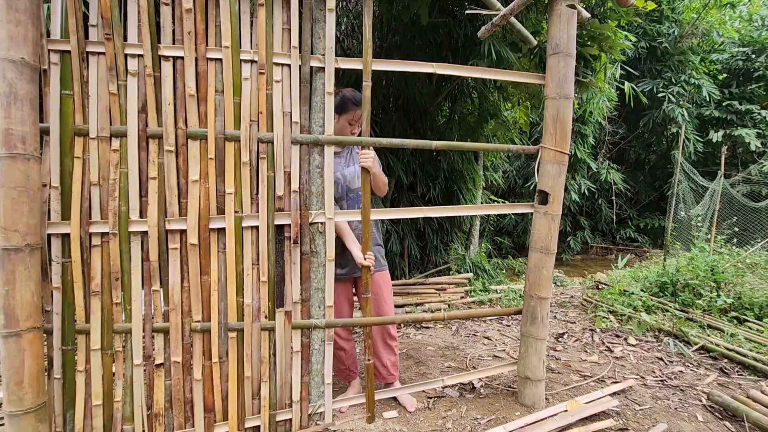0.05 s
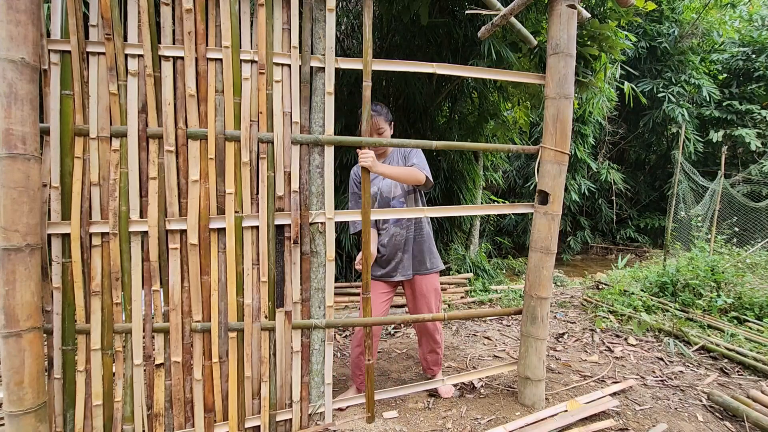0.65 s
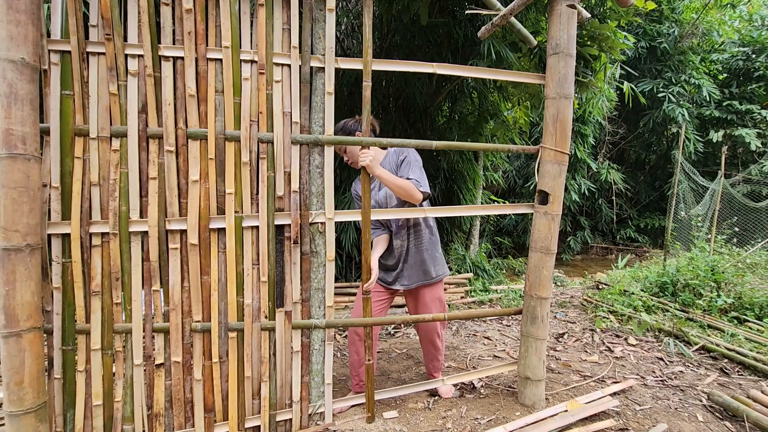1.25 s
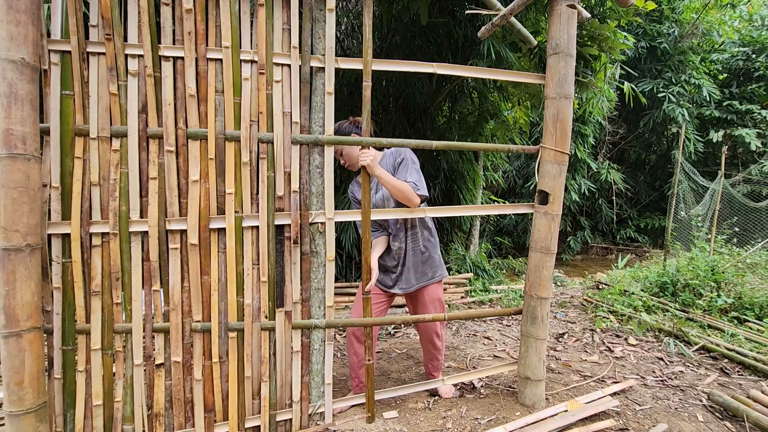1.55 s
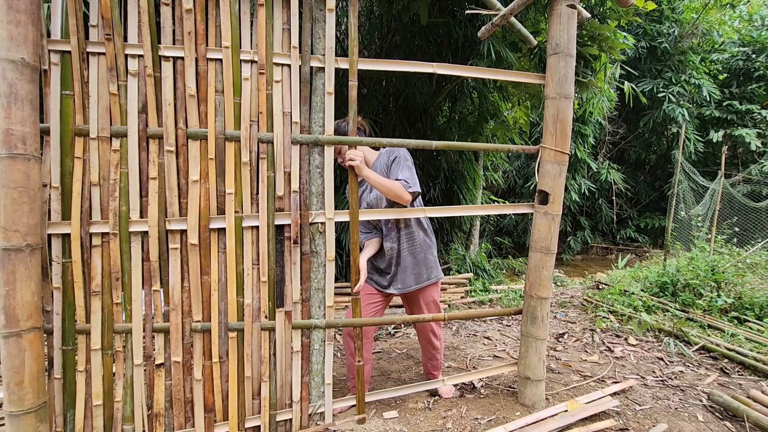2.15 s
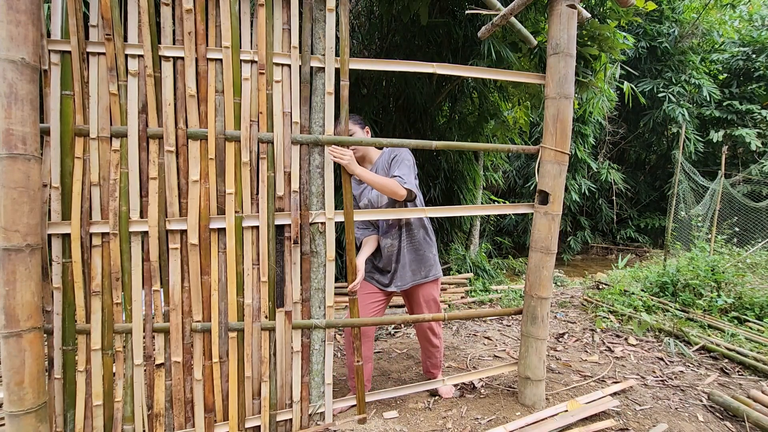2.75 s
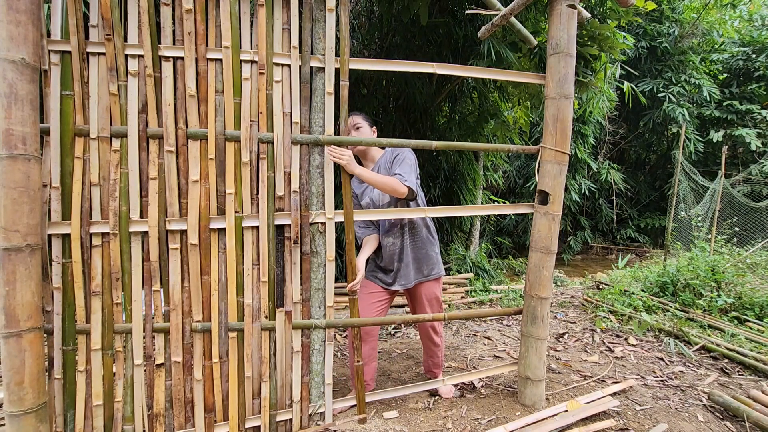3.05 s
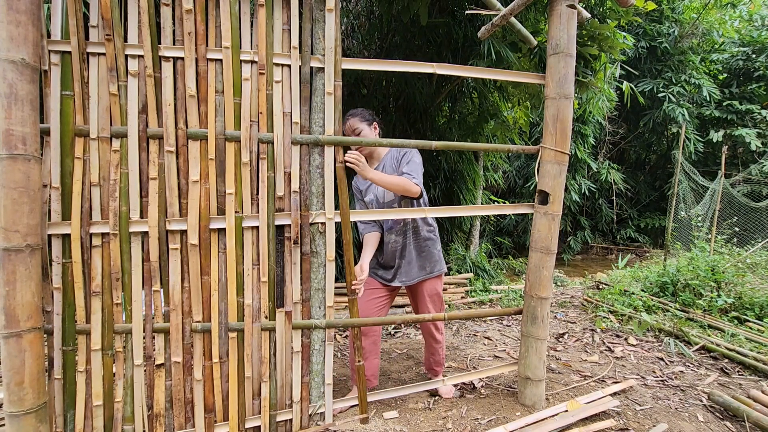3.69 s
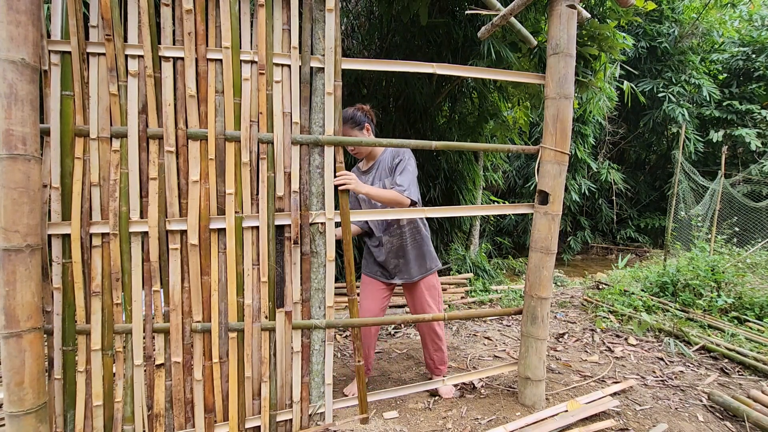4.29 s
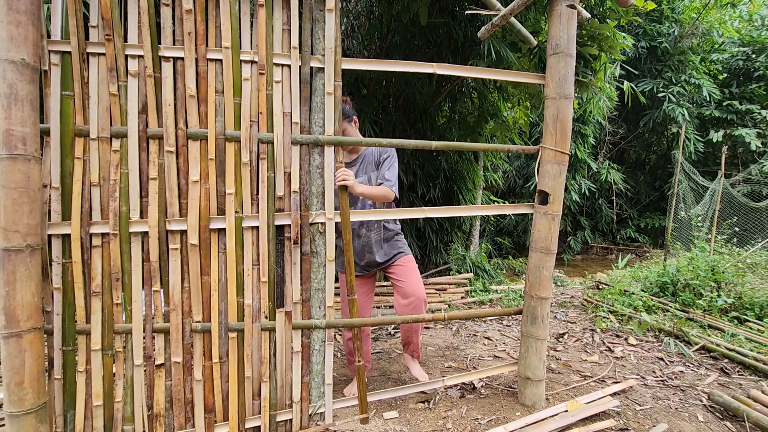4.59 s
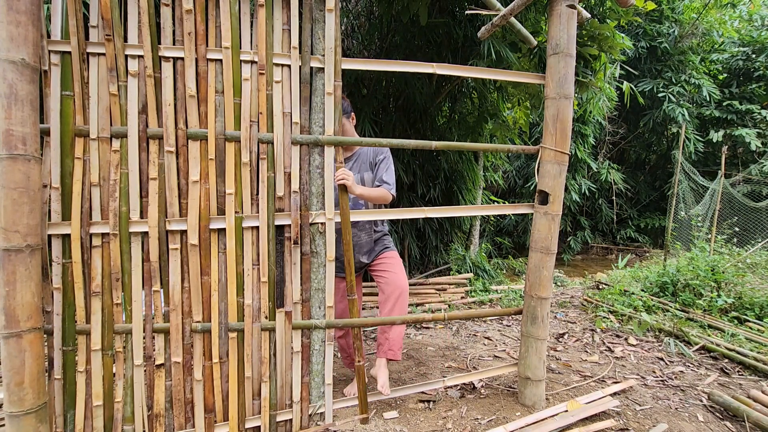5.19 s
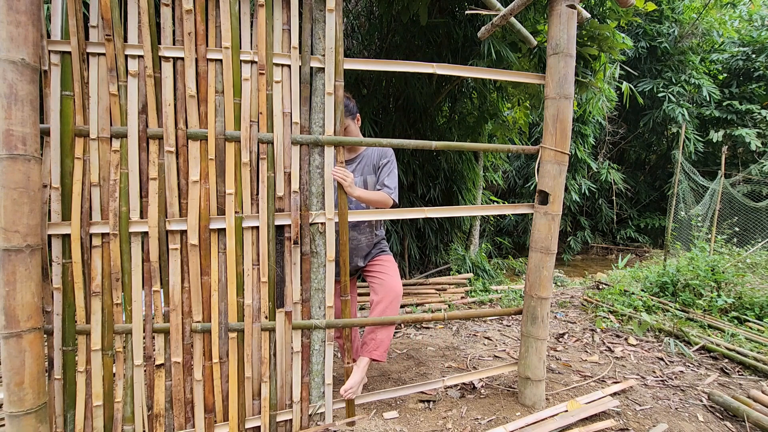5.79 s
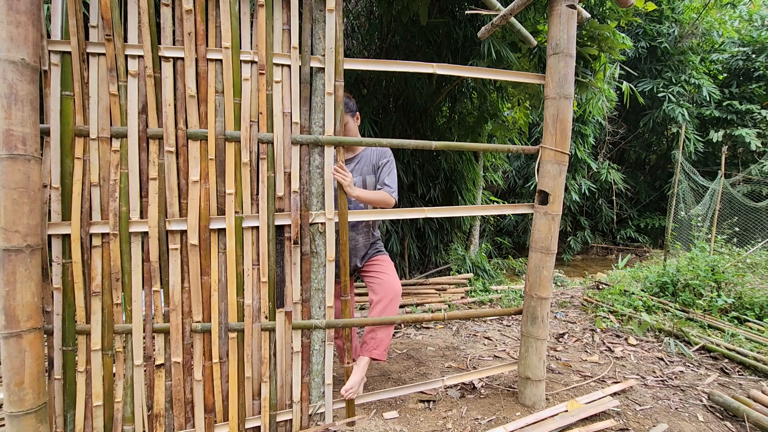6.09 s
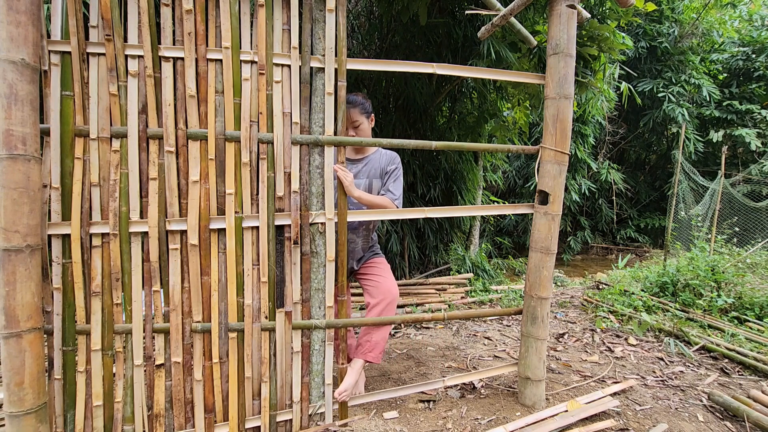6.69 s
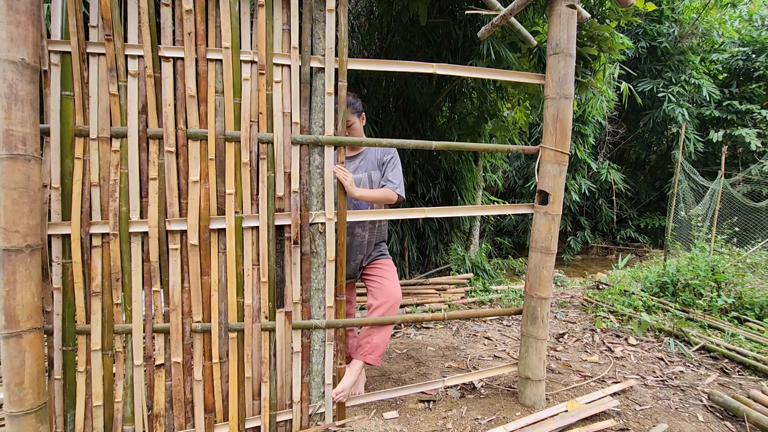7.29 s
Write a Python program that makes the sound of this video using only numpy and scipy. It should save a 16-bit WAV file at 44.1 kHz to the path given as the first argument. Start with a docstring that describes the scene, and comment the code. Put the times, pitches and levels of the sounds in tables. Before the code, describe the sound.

A hollow bamboo pole knocks and scrapes against a rattling slatted wall, over a steady stream and trilling crickets.

```python
"""In a forest clearing, a long bamboo pole is slid through the hands and stood against a slatted wall.
The hollow pole knocks on the rails; each knock rattles the bamboo slats and sets the frame humming.
Two soft, bubble-like plips come early; later cane ticks on cane and the pole scrapes on a rail.
Hands rub, and bare feet and the swaying frame make low rumbles.
Behind it a stream washes and bubbles, and crickets trill with their wings."""
import sys
import numpy as np
from scipy import signal
from scipy.fft import rfft, irfft
from scipy.io import wavfile

SR = 44100
rng = np.random.default_rng(int(sys.argv[2]) if len(sys.argv) > 2 else 0)


def inscribe(sig):
    """Save sig as 16-bit PCM at rate SR to the path in sys.argv[1].

    A 1-D sig is mono; a 2-D sig holds one channel per row.
    Samples are clipped to [-1, 1] before scaling.
    """
    pcm = np.round(np.clip(np.atleast_2d(sig).T, -1, 1) * 32767)
    wavfile.write(sys.argv[1], SR, pcm.astype(np.int16))


N = 332514
TIME = np.arange(N) / SR
HIT_TIME = TIME[:SR // 2]   # half a second, room for one short sound


# the hollow pole's tones: f/Hz, level/dB, fade/s (a fade, or t60, is the time to drop by 60 dB)
POLE_TONES = [(540, -14.5, 0.09), (671, -12.5, 0.17), (833, -12, 0.094), (1432, -7.5, 0.047),
              (1704, 0, 0.034), (2105, -7.5, 0.058), (2330, -2, 0.027), (3390, -5, .018), (3540, 4, 0.029),
              (3910, 5, 0.025), (4210, 11, 0.014), (4805, 6, 0.022), (5020, -4, 0.027), (5500, -6, 0.015),
              (7220, -10, 0.053), (8350, -2, 0.0086), (11040, -8, 0.012), (4100, -15, 0.25),
              (4600, -20, 0.36), (4860, -27, .18), (2280, -22, 0.14), (1400, -30, 0.2)]
# knocks: t/s, level/dB, brightness/dB per octave, hollow boost/dB, favoured f/Hz, frame hum/dB
POLE_KNOCKS = [(3.224, -42, -5, 0, 655, -10), (4.679, -23.5, 1.95, -3.5, 4400, -2),
               (4.6861, -36, 0, 3, 4200, 8), (4.701, -37, 1, 5, 700, -13),
               (4.7325, -25, 1, -4.5, 1720, -1.5), (4.9021, -40.5, -3.5, -1, 844, -3),
               (5.045, -28, 0.8, 0.5, 570, 5), (5.4396, -24.5, 3.5, 2.5, 2210, 1),
               (5.447, -37.5, -2, -2, 550, -4), (5.599, -46, -0.5, 2, 1700, 6),
               (6.748, -44, -1.5, -4, 550, -5)]

def knocks(hollow_below_hz=3000, shell_db=-4, favour_db=4.5, favour_octaves=0.19):
    """The pole cracks and rings briefly, the slats clack and rattle, and the frame hums on."""
    out = np.zeros((2, N))
    contact = onset(t60=0.0035)
    for start_s, db, tilt_db, hollow_db, favoured_hz, hum_db in POLE_KNOCKS:
        tones = []
        for hz, tone_db, t60 in POLE_TONES:
            # Low tones come from the hollow inside, high ones from the thin shell.
            part_db = hollow_db if hz < hollow_below_hz else shell_db
            # The spot that is hit favours the tones near one pitch.
            nearness = np.exp(-(np.log2(hz / favoured_hz) / favour_octaves) ** 2)
            tones.append((hz, tone_db + part_db + favour_db * nearness, t60))
        ring = struck(tones, tilt_db)
        slats = from_db(3.5) * clack(tilt_db)
        crack = from_db(-9) * short_hiss(RUB_COLOUR, tilt_db=3)[0] * dying(t60=0.01)
        direct = placed((ring + slats + crack) * contact, pan_db=-2)
        wall = from_db(-2) * rattle(tilt_db) + from_db(hum_db) * frame_thud()
        add(out, start_s, from_db(db) * (direct + wall))
    return out


# colour of the loose slats (how strong each pitch is): f/Hz, level/dB
SLAT_COLOUR = [(40, -27), (140, 4.5), (260, -4), (480, 3), (850, 2.5), (1120, -1), (1800, 1.5), (2500, 2),
               (2950, 2.5), (3500, 0), (4500, 1), (5800, -7.5), (8400, -11.5), (9700, -23), (16000, -33)]

def clack(tilt_db):
    """The neighbouring slats are jolted all at once."""
    return short_hiss(SLAT_COLOUR, tilt_db)[0] * dying(t60=0.038)


# how long the slats rattle at each pitch: f/Hz, fade/s
RATTLE_FADES = [(80, 0.45), (220, 0.33), (560, 0.19), (1500, 0.13), (4200, 0.11), (10000, 0.063)]

def rattle(tilt_db):
    """The rattle spreads through the whole wall, and its treble dies first."""
    spectrum = rfft(short_hiss(SLAT_COLOUR, tilt_db))
    centres = [hz for hz, _ in RATTLE_FADES]
    out = 0
    for share, (_, t60) in zip(np.eye(len(centres)), RATTLE_FADES):
        band = at_hz(list(zip(centres, share)), frequencies(HIT_TIME))
        out += irfft(spectrum * band, len(HIT_TIME)) * dying(t60)
    return out * onset(t60=0.0053)


# the lashed frame's tones: f/Hz, level/dB, fade/s
FRAME_TONES = [(152, -18.5, 0.052), (81.8, -25.5, 0.5), (157.6, -17, 0.31)]

def frame_thud():
    """The knocked frame gives a short thud and two low, lingering tones."""
    return struck(FRAME_TONES)


# the tones in a tick: f/Hz, level/dB, fade/s
TICK_TONES = [(1450, -3.5, 0.013), (2356, 4, 0.0052), (2730, 5, 0.026), (3170, 11.5, 0.016),
              (3980, 7.5, .008)]
# two soft, bubble-like plips early on, then cane on cane: t/s, level/dB, spray boost/dB, pitch ratio
RINGING_TICKS = [(.869, -52, -20, 0.71), (.892, -47, -14, 0.69), (1.292, -47.5, -20, 0.4),
                 (1.2985, -46, -20, 0.53), (3.1812, -37.5, -3, 0.84), (3.2111, -33, -4, 0.79),
                 (3.215, -32.5, 1, 0.82), (5.304, -35.5, 4.5, 1.023), (5.4038, -37.5, 1, 0.9),
                 (6.553, -47, 10.5, 0.92), (6.575, -46, -6, 1), (6.742, -45, 0, 0.625),
                 (6.8521, -36, -18, 0.91), (6.889, -36, 1.5, 1), (6.8923, -42, -9, 1.4),
                 (7.025, -54, 13.5, 0.68)]

def ticks():
    """A short ring and a spray of hiss: a soft plip, or a caught edge of cane letting go."""
    out = np.zeros((2, N))
    for start_s, db, spray_db, pitch in RINGING_TICKS:
        tones = [(hz * pitch, tone_db, t60) for hz, tone_db, t60 in TICK_TONES]
        ring = struck(tones) * onset(t60=0.0023)
        spray = from_db(spray_db - 1) * short_hiss(RUB_COLOUR) * dying(t60=0.041)
        scatter = from_db(-6.5) * short_hiss(RUB_COLOUR, tilt_db=-3.5) * dying(t60=0.061)
        add(out, start_s, from_db(db) * (placed(ring, pan_db=-3.5) + spray + scatter))
    return out


# colour of the scraping: f/Hz, level/dB
RAIL_COLOUR = [(110, -12), (235, 9.5), (380, 2), (680, 3), (1000, 2.5), (2600, 4.5), (4200, 1), (6000, -4),
               (8500, 0), (10500, -9.5), (16000, -9)]
# one drag and one sudden slip: t/s, hold/s, level/dB, fade/s
RAIL_SCRAPES = [(3.19, 0.07, -41.5, .17), (3.201, 0.012, -32.5, 0.036)]

def scrapes(attack_s=0.0025):
    """The pole drags on a rail in many tiny, coarse slips."""
    effort = sum(from_db(db) * swell(s, hold, attack_s, t60) for s, hold, db, t60 in RAIL_SCRAPES)
    return effort * coloured(grains(per_s=20000, spread_db=2), RAIL_COLOUR)


# colour of hands and clothes rubbing on cane: f/Hz, level/dB
RUB_COLOUR = [(150, -4.5), (900, -0.5), (2000, 3), (3200, 8), (4200, 2), (5200, 0), (8000, -2.5),
              (11000, -6.5), (16000, -5.5)]
# hand strokes: t/s, hold/s, level/dB, brightness/dB per octave, frame sway/dB
HAND_STROKES = [(1.651, 0.041, -43.5, .5, -59), (1.993, 0.049, -48, 0, -66), (2.367, 0.032, -46, 0, -57),
                (5.288, .005, -41.5, -0.5, -47), (5.355, .07, -49.5, 0, -53),
                (6.544, 0.2, -50, -1.5, -55.5), (6.839, .015, -47, -2.5, -59),
                (7.015, 0.031, -53, -1.5, -53.5)]

def rubs():
    """Fine slips under the hands make a hiss that swells once for each stroke."""
    out = np.zeros((2, N))
    friction = from_db(0.8 * drift(per_s=90))   # grips and slackens as the grain passes
    slips = friction * grains(per_s=22000, spread_db=3)
    for start_s, hold_s, db, tilt_db, _ in HAND_STROKES:
        start = round(start_s * SR)
        stroke = slice(start, start + len(HIT_TIME))
        effort = from_db(db) * swell(start_s, hold_s, attack_s=0.031, t60=0.24)[stroke]
        add(out, start_s, effort * coloured(slips[:, stroke], RUB_COLOUR, tilt_db))
    return out


def frame_sway(knock_sway_db=-27):
    """Every hand stroke and knock sets the frame swaying with a low rumble."""
    pushes = [(s, hold, db) for s, hold, *_, db in HAND_STROKES]
    pushes += [(s, 0, db + knock_sway_db) for s, db, *_ in POLE_KNOCKS]
    power = sum((from_db(db) * swell(s, hold, attack_s=0.03, t60=0.74)) ** 2 for s, hold, db in pushes)
    return np.sqrt(power) * coloured(noise(), RUMBLE_COLOUR)


# moments when the pole leans hardest on the frame: t/s, level/dB
POLE_LEANS = [(.05, -63), (1.5, -61.5), (2.7, -62), (4.4, -63), (5.17, -58), (6.8, -60.5)]

def frame_hum(fade_db_per_s=29):
    """The frame trembles at its own pitch under the pole's weight."""
    weight = sum(from_db(db - fade_db_per_s * abs(TIME - s)) for s, db in POLE_LEANS)
    hz = FRAME_TONES[-1][0]
    narrow_band = signal.butter(2, [hz - 9, hz + 9], "band", fs=SR, output="sos")
    return weight * rms_one(signal.sosfilt(narrow_band, noise()[0]))


# colour of shuffling feet and the swaying frame: f/Hz, level/dB
RUMBLE_COLOUR = [(20, -8), (40, -3), (85, -0.5), (160, -7), (350, -9), (700, -16.5), (2000, -30)]
# low rumbles of feet shifting, and of the frame swaying as the pole scrapes: t/s, hold/s, level/dB
LOW_RUMBLES = [(2.3, 0.65, -68), (3.197, .02, -56), (6.046, .45, -63), (7.35, .15, -64)]
# bare heels landing: t/s, level/dB, f/Hz, fade/s
HEEL_THUDS = [(2.87, -50, 50, .14), (4.312, -43, 68, 0.17)]

def rumbles_and_heels(floor_db=-73.5):
    """A faint rumble swells as feet shift or the scraped frame sways; heels land with dull thuds."""
    swells = sum(from_db(db) * swell(s, hold, attack_s=0.1, t60=0.46) for s, hold, db in LOW_RUMBLES)
    out = np.hypot(swells, from_db(floor_db)) * coloured(noise(), RUMBLE_COLOUR)
    for start_s, db, hz, t60 in HEEL_THUDS:
        add(out, start_s, struck([(hz, db, t60)])[None] * onset(t60=0.02))
    return out


# colour of the far crickets: f/Hz, level/dB
CHORUS_COLOUR = [(5900, -39), (6400, -4), (6650, -2), (7150, 0), (7400, -5.5), (7800, -20)]
# near crickets: wing strokes per second, f/Hz, pitch fall in a stroke/Hz, level/dB
NEAR_CRICKETS = [(22, 6640, 395, -57), (19.1, 7090, 326, -64)]

def crickets(unsteady=0.0098, wander_hz=75, uneven_db=2):
    """Each wing stroke is a falling whistle, heard directly and smeared by leaves; a chorus is behind."""
    out = from_db(-53.5) * coloured(noise(), [(5000, -80)] + CHORUS_COLOUR + [(9000, -82)])
    for per_s, hz, fall_hz, db in NEAR_CRICKETS:
        pace, wander, vigour = drift(per_s=2), drift(per_s=26), drift(per_s=12)
        stroke = np.cumsum(per_s * (1 + unsteady * pace)) / SR % 1   # 0 to 1 in each stroke
        pitch = hz + fall_hz * (0.5 - stroke) + wander_hz * wander
        loudness = np.sin(np.pi * stroke) ** 4 * from_db(uneven_db * vigour)
        song = loudness * np.sin(2 * np.pi * np.cumsum(pitch) / SR)
        leaf_echoes = noise(len(HIT_TIME)) * dying(t60=0.084)
        scattered = rms_one(signal.fftconvolve(song[None], leaf_echoes, axes=1)[:, :N])
        out += from_db(db) * rms_one(scattered + from_db(-3) * rms_one(song))
    return out


# colour of the stream and leaves: f/Hz, level/dB
STREAM_COLOUR = [(25, -22), (80, -15), (125, -1), (215, -3.5), (320, -1.5), (600, -4), (1000, -3.5),
                 (1500, -2.25), (2150, -4), (2700, -6), (4200, -7), (5700, -10), (8300, -13),
                 (10000, -19.5), (16000, -19.5)]
# the part that comes straight from the left: f/Hz, level/dB against the wash all around
STREAM_FROM_LEFT = [(200, -18), (700, -4), (2000, -4.5), (5000, -15.5), (12000, -12)]

def stream(right_delay_s=0.000476):
    """A steady wash of water, partly from the left, with trickles in it and a low gurgle."""
    hz = frequencies(TIME)
    left = rfft(coloured(noise(), STREAM_COLOUR)[0]) * from_db(at_hz(STREAM_FROM_LEFT, hz))
    right = left * np.exp(-2j * np.pi * hz * right_delay_s)
    direct = irfft(np.array([left, right]), N)
    wash = rms_one(coloured(noise(), STREAM_COLOUR) + direct)
    trickle = from_db(-58.5) * bubbles(low_hz=1280, high_hz=2290, per_s=30, sharpness=15)
    gurgle = from_db(-67) * bubbles(low_hz=177, high_hz=484, per_s=9, sharpness=8.1)[0]
    return from_db(-49) * wash + trickle + gurgle


def bubbles(low_hz, high_hz, per_s, sharpness):
    """Random bubbles ring at a dozen pitches, each pitch louder at some moments than others."""
    pitches = np.geomspace(low_hz, high_hz, num=12)
    surges = [from_db(3 * drift(per_s=5)) for _ in pitches]
    out = 0
    for hz, surge in zip(pitches, surges):
        pops = surge * grains(per_s, spread_db=4) + 1e-18
        out += signal.lfilter(*signal.iirpeak(hz, sharpness, fs=SR), pops)
    return rms_one(out)


def struck(tones, tilt_db=0):
    """A struck thing rings with fading tones, a little different every time."""
    out = 0
    for k, (hz, db, t60) in enumerate(tones):
        gain = (-1) ** k * from_db(db + tilt_db * octaves(hz) + rng.normal(0, 1))
        pitch = hz * (1 + rng.normal(0, 0.011))
        out += gain * dying(t60) * np.sin(2 * np.pi * pitch * HIT_TIME)
    return out


# how far a nearby sound's wave is ahead on the left: f/Hz, phase/radians
LEFT_LEAD = [(300, 0), (1000, 1), (1700, 1.1), (2200, 1.5), (2700, 1.5), (3300, 4.5), (4100, 3.5),
             (4600, 4.5), (5400, 1.8), (6600, 1.3)]

def placed(sound, pan_db):
    """A nearby sound differs between left and right; negative pan_db makes the right louder."""
    lead = np.exp(1j * at_hz(LEFT_LEAD, frequencies(sound)))
    left = irfft(rfft(sound) * lead, len(sound))
    fade = np.cos(np.pi / 2 * HIT_TIME / HIT_TIME[-1])
    return np.array([left * from_db(pan_db / 2), sound * from_db(-pan_db / 2)]) * fade


# how alike left and right are for sound from all around: f/Hz, likeness from 0 to 1
SIDE_LIKENESS = [(60, 0.95), (140, 0.92), (300, 0.72), (650, 0.02)]

def coloured(pair, colour, tilt_db=0):
    """Two unrelated signals become left and right with this colour, alike in the bass."""
    hz = frequencies(pair)
    mid, side = rfft(pair)
    alike = np.clip(at_hz(SIDE_LIKENESS, hz), 0, 1)
    both = np.sqrt(1 + alike) * mid + np.sqrt(1 - alike) * side * [[1], [-1]]
    gain = from_db(at_hz(colour, hz) + tilt_db * octaves(hz))
    return rms_one(irfft(both * gain, pair.shape[-1]))


def short_hiss(colour, tilt_db=0):
    return coloured(noise(len(HIT_TIME)), colour, tilt_db)


def noise(count=N):
    return rng.standard_normal((2, count))


def grains(per_s, spread_db):
    """Tiny random clicks of uneven size."""
    born = rng.random((2, N)) < per_s / SR
    strength, size = rng.standard_normal((2, np.count_nonzero(born)))
    out = np.zeros((2, N))
    out[born] = strength * from_db(spread_db * np.clip(size, -2, 2))
    return out


def drift(per_s):
    """A random wander with about this many turns a second."""
    count = int(per_s * TIME[-1]) + 2
    return rms_one(np.interp(TIME, np.linspace(0, TIME[-1], count), rng.standard_normal(count)))


def swell(start_s, hold_s, attack_s, t60):
    """A volume that rises to 1, holds and dies away."""
    age = TIME - start_s
    rise = np.clip(age / attack_s, 0, 1)
    return rise * from_db(-60 * np.clip((age - attack_s - hold_s) / t60, 0, 3))


def dying(t60):
    return from_db(-60 * HIT_TIME / t60)


def onset(t60):
    return 1 - dying(t60)


def from_db(db):
    return 10 ** (np.asarray(db) / 20)


def rms_one(x):
    """Scale a signal to an average strength (rms) of 1."""
    return x / np.sqrt(np.mean(x ** 2, axis=-1, keepdims=True) + 1e-20)


def at_hz(points, hz):
    """Read between a table's rows along a musical pitch scale."""
    known_hz, values = np.transpose(points)
    return np.interp(np.log(hz + 1), np.log(known_hz), values)


def frequencies(x):
    return np.fft.rfftfreq(x.shape[-1], 1 / SR)


def octaves(hz):
    """Octaves above the middle of the pole's range."""
    return np.log2(np.maximum(hz, 200) / 2000)


def add(out, start_s, sound):
    start = round(start_s * SR)
    out[:, start:start + sound.shape[-1]] += sound[:, :N - start]


def scene():
    """The pole, the wall and the feet in front; crickets and stream behind."""
    front = knocks() + ticks() + scrapes() + rubs()
    return front + frame_hum() + frame_sway() + rumbles_and_heels() + crickets() + stream()


def record(dry, cutoff_hz=15950):
    """The very highest treble is cut off steeply."""
    return signal.sosfilt(signal.ellip(12, 0.1, 80, cutoff_hz, fs=SR, output="sos"), dry)


dry = scene()
out = record(dry)
inscribe(out)
```